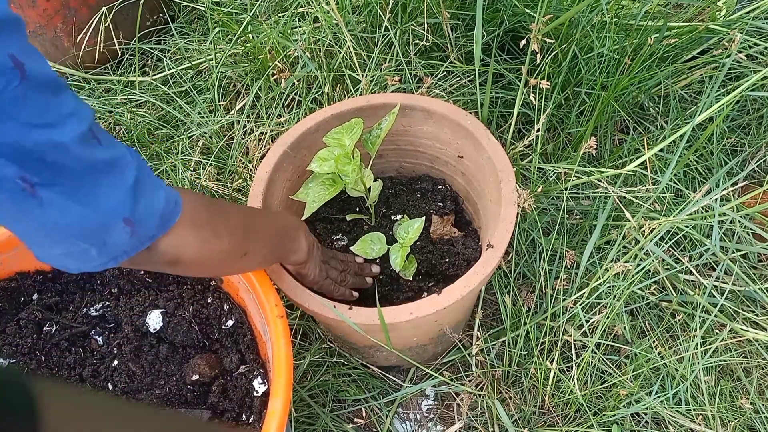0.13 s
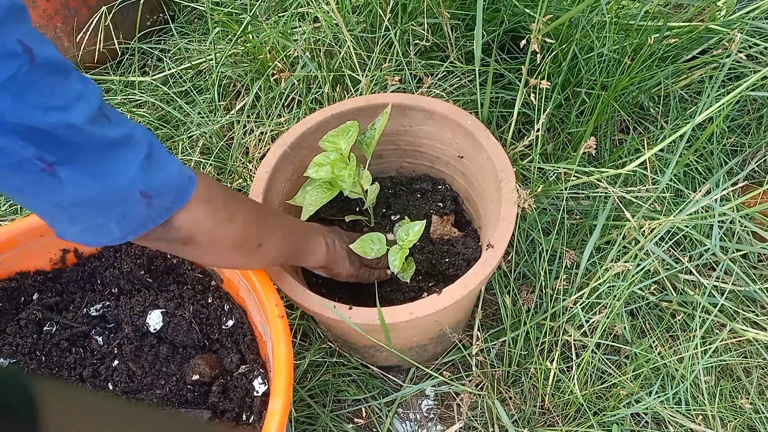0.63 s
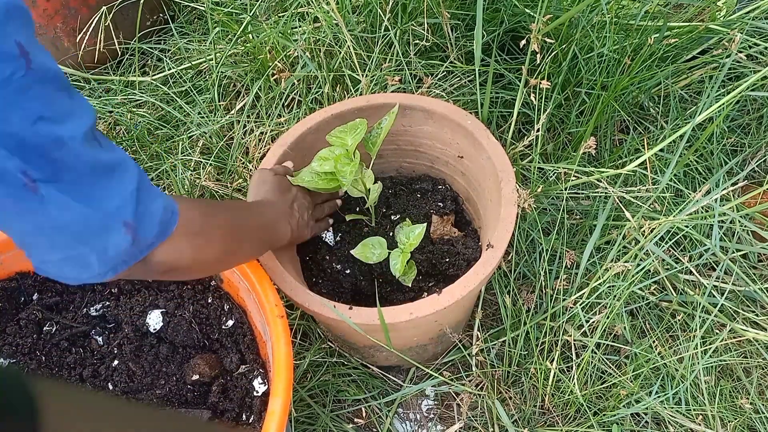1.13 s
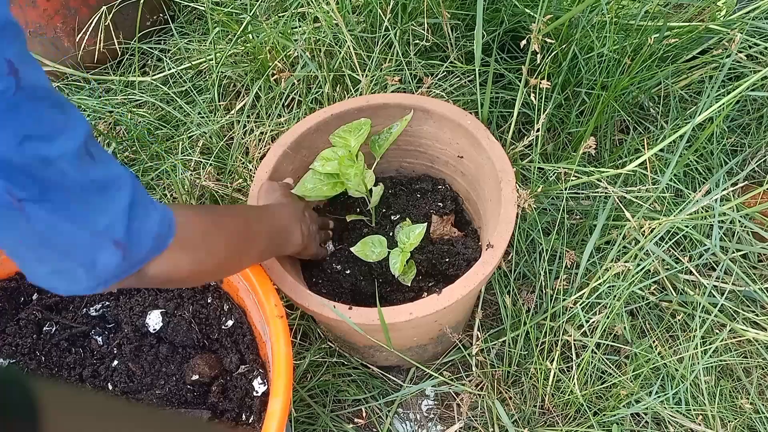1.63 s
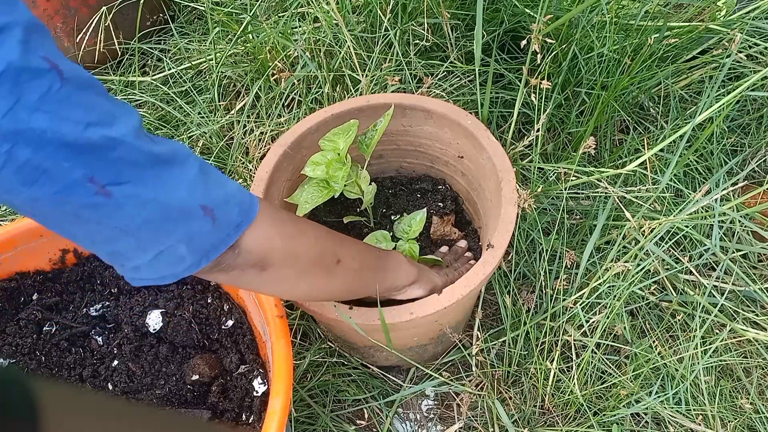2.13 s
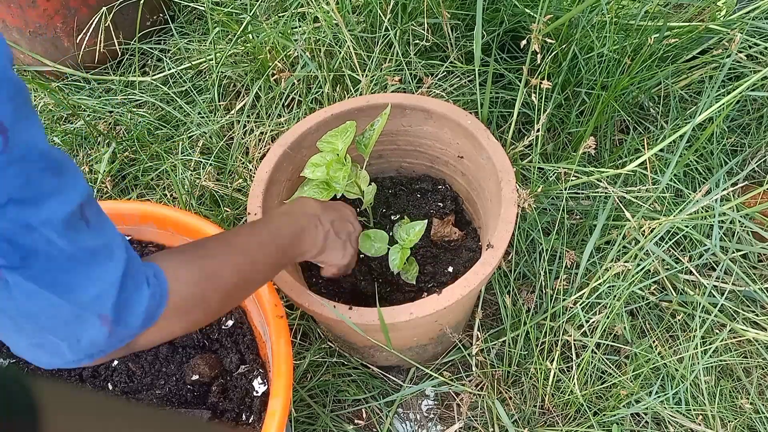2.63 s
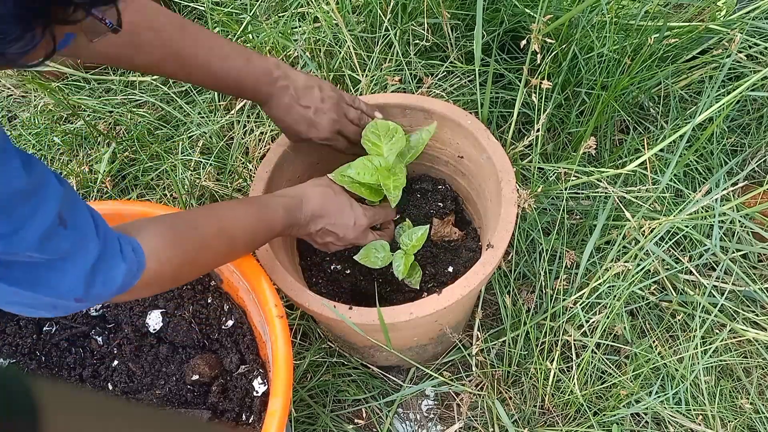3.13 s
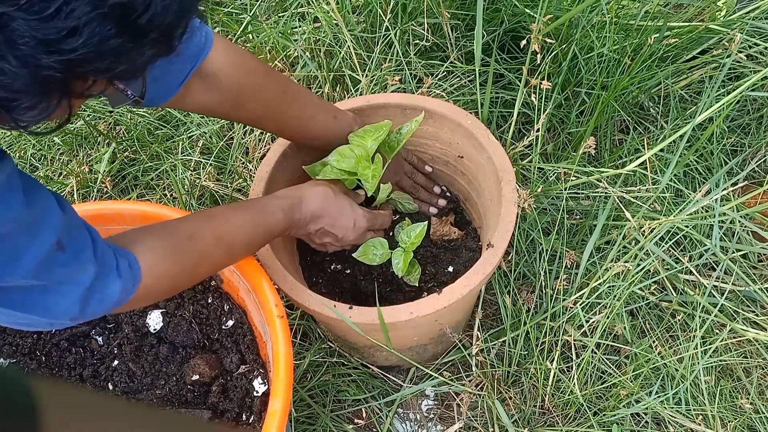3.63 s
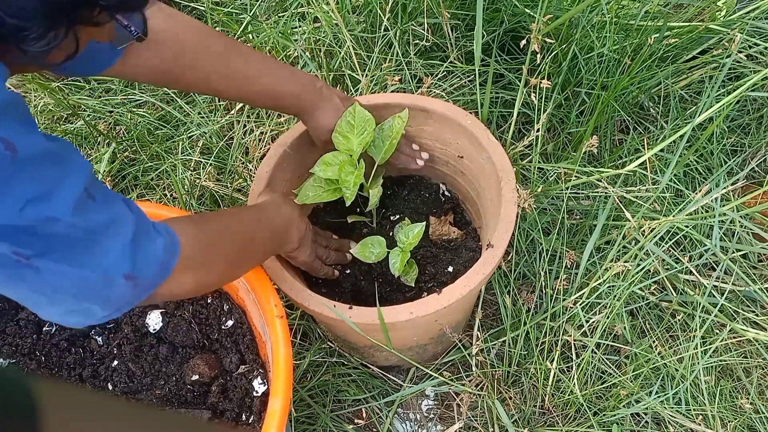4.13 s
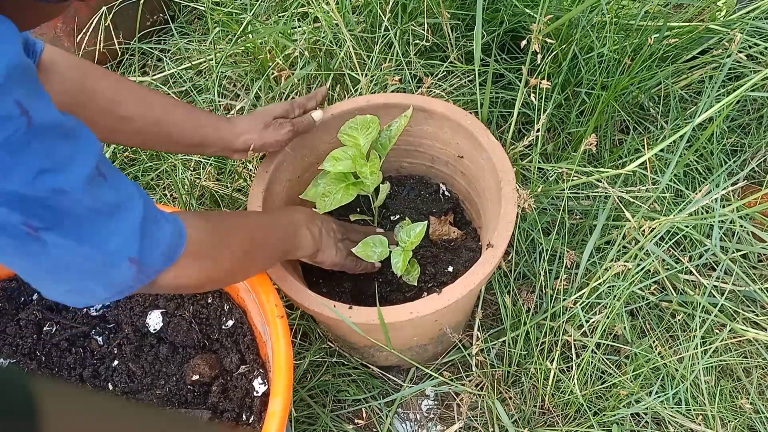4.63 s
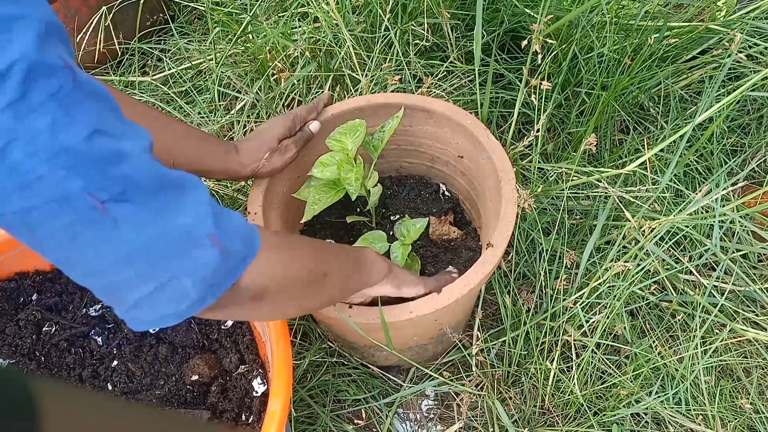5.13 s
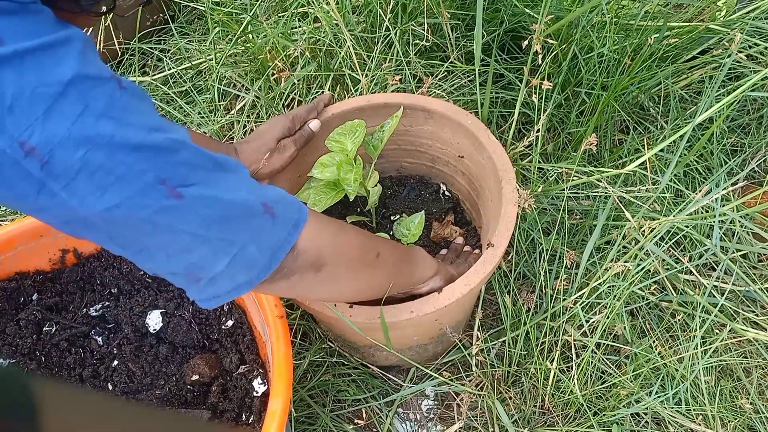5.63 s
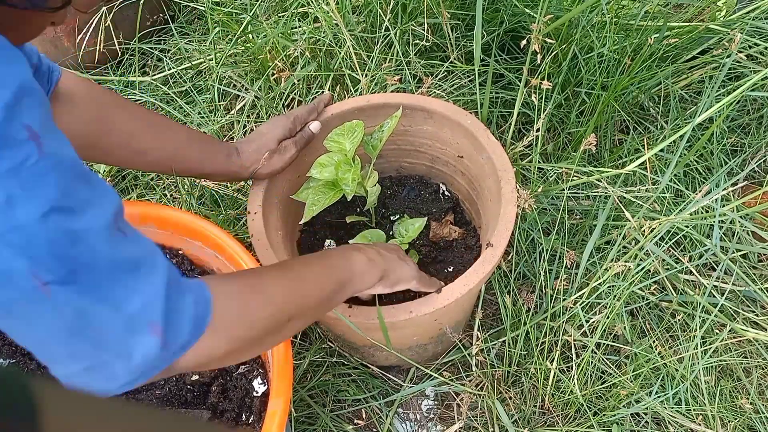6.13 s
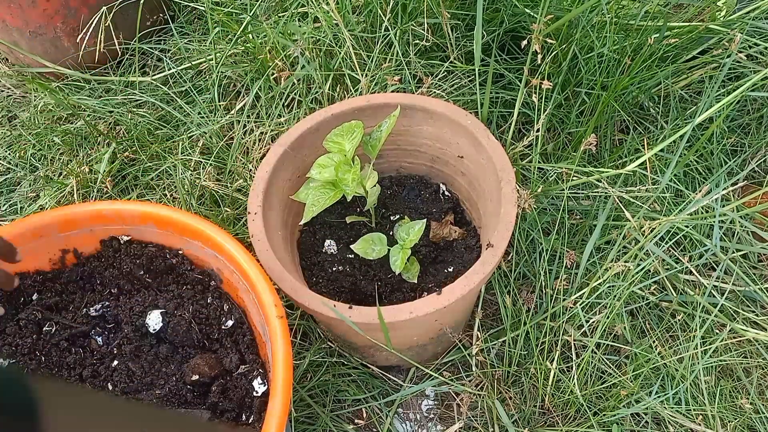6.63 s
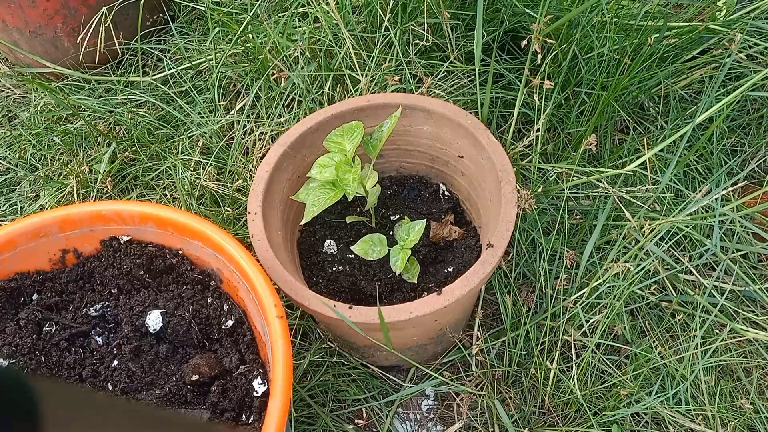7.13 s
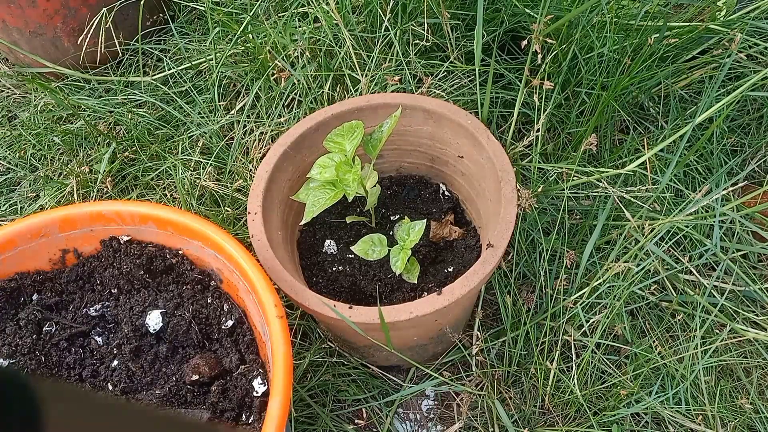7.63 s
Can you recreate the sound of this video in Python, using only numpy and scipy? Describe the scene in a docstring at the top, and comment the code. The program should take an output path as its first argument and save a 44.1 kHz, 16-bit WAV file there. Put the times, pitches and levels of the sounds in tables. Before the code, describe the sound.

In a garden, a near bird gives sharp, quickly falling chirps about twice a second, often followed by a short lower note, with brief reflections from ground and walls. Another bird answers late, and distant birds swoop, rasp and whistle faintly. Soft air and a faint low hum lie beneath. A barely audible pat comes midway; near the end a dull soil pat and a crisp snap sound close to the stereo microphone.

```python
"""Chirping bird in a walled garden

A near bird repeats a sharp falling chirp, often with a short low note after it: gliding sines and an overtone,
thrown back by ground and walls. Another bird answers; farther ones whistle and swoop as sines, or call hoarsely
as noise bands. Low sines of wandering level stand for the narrow noise bands of a machine hum; shaped noise makes
the soft air, with faint low blips in it. A faint soft pat comes midway; near the end a stronger pat and noise-struck
ringing snaps sound close to the microphone.
"""
import sys
import numpy as np
from scipy import signal
from scipy.fft import irfft
from scipy.io import wavfile
from scipy.ndimage import uniform_filter1d

SR = 44100
rng = np.random.default_rng(int(sys.argv[2]) if len(sys.argv) > 2 else 0)


def store_wav(level_fs):
    """Save 16-bit WAV to argv[1]."""
    pcm = np.round(np.clip(np.atleast_2d(level_fs), -1, 1) * 32767)
    wavfile.write(sys.argv[1], SR, pcm.T.astype(np.int16))


def amplitude_ratio(level_db):
    """Convert a level in decibels to the matching linear amplitude (field) ratio."""
    exponent = np.asarray(level_db, float) / 20
    return 10 ** exponent


N = 342657

# narrow low bands of the hum, each played as one sine: f/Hz
HUM_BANDS = [68.4, 87.5, 137.5]
# random level wander of narrow low noise bands, one list per band: t/s, level/dB
HUM_LEVELS = [
    [(0.0, -65), (0.48, -56.5), (0.93, -69), (1.1, -59), (1.6, -71.5), (2.21, -60), (2.32, -81),
     (2.53, -56), (3.81, -67.5), (3.87, -55), (5.28, -67), (6.79, -58), (6.9, -79), (7.12, -58.5),
     (7.75, -62), (7.77, -66)],
    [(0.0, -54), (0.15, -67), (0.41, -51.5), (0.73, -60.5), (0.84, -52.5), (1.82, -61), (1.86, -70),
     (2.21, -55.5), (2.36, -65.5), (6.25, -73), (6.51, -57.5), (6.84, -69), (7.23, -55.5), (7.62, -79),
     (7.73, -55), (7.77, -55)],
    [(0, -69), (2.6, -73.5), (4.6, -66), (5.2, -80), (6.8, -71), (7.77, -81.5)],
]
# spectrum of the air, before its overall level is set: f/Hz, relative density/dB
AIR_SPECTRUM = [(18, -41), (32, -28), (45, -7), (80, -5), (130, -9.5), (210, -14), (470, -12), (920, -15.5),
                (1600, -12), (2300, -15.5), (3500, -18), (5100, -21), (6400, -15.5), (7500, -28)]
# slow swell of the air: t/s, relative level/dB
AIR_SWELL = [(0, 0.15), (2.1, -1.2), (2.8, 1.2283), (5.8, 0.5), (7.77, -0.12)]
# likeness of the air left and right: f/Hz, correlation (1 = alike, below 0 = opposed)
AIR_LIKENESS = [(60, 0.9378), (130, 1), (290, 0.7282), (650, 0.1808), (1440, -0.43), (3200, 0.45),
                (7080, -0.016)]
# stereo lean of the air: f/Hz, left minus right/dB
AIR_LEAN = [(60, 2), (200, 1), (650, 0.5), (2150, 3.5), (7080, 1.5)]
# far falling swoops: end t/s, length/s, level/dB
SWOOPS = [(.174, .16, -54), (1.078, .17, -54.5), (2.01, .18, -54.5), (3.055, .12, -53), (4.138, .13, -52.5),
          (5.273, .14, -52), (6.35, .2, -51.5), (7.27, .19, -52)]
# faint hoarse calls: t/s, length/s, centre f/Hz, width/Hz, level/dB
HOARSE_CALLS = [(0.051, 0.28, 1640, 400.1, -60), (0.898, 0.2015, 6632, 300.8, -62.5),
                (1.622, 0.1984, 1838, 250, -58.5), (2.118, 0.27, 6260, 501, -64),
                (4.601, 0.28, 1570, 357, -63), (5.096, 0.1986, 1656, 342.3, -59),
                (5.905, 0.23906, 6520, 297.4, -62.5), (6.122, 0.3, 1484, 401.5, -57.5),
                (6.702, 0.1638, 1500, 247, -52), (2.5, 0.1356, 1160, 149.1, -56.5),
                (7.281, 0.35, 6270, 400, -61.5)]
# scattering of the garden: f/Hz, decay by 60 dB/s, relative level/dB
SCATTERING = [(1500, 0.39, -3.5), (2480, 0.51, -0.5), (3530, 0.47, 2.5), (5055, 0.4316, 3), (6561, 0.44, 7),
              (7494, 0.29, -2.5)]
# near bird's note shapes, before each call's pitch and length factors:
# onset f/Hz, turn f/Hz, rest f/Hz, sag time/ms, rise/ms, steady/ms, hold/ms, fade/(dB per ms)
CHIRP_SHAPE = (3050, 3885, 1940, 16.66, 4.5, 3.19, 27.5, 1.6)
LOW_NOTE_SHAPE = (2750, 2600, 1540, 24, 6, 0.53, 4.5, 1.42)
# near bird's calls: t at the end of the rise/s, peak level before the echoes/dB, pitch factor, length factor
CHIRPS = [(0.3456, -27, 0.95, 0.91), (0.773, -26, 0.95, 0.96), (1.3436, -25.5, 0.96, 0.94),
          (2.487, -23.5, 1, 0.94), (2.7883, -22, 0.97, 0.91), (3.1204, -20.5, 0.98, 0.94),
          (3.4935, -19.5, 0.99, 0.94), (3.8542, -22.5, 0.97, 0.97), (4.2601, -24, 0.96, 0.94),
          (4.8667, -25, 0.97, 0.9809), (5.2828, -24.5, 0.968, 1), (5.7019, -23, 0.96, .99),
          (6.2949, -23.5, 0.96, 0.91), (6.6709, -22, 0.95, 0.94), (7.2426, -26.5, 0.96, 0.97),
          (7.7006, -27, 0.96893, 0.91)]
LOW_NOTES = [(2.864, -22, 0.978, 1.01), (3.199, -20.5, 1, 1.01), (3.577, -20, 0.99, 1.01),
             (3.935, -21.5, 0.99, 1.01), (4.339, -25.5, 1.01, 1.01), (5.366, -25, 0.97, 1.1),
             (6.376, -24, 0.97, 0.93)]
# near bird's second harmonic, before the echoes: f/Hz, level relative to the fundamental/dB
OVERTONE = [(4000, -46), (4600, -37), (5100, -21), (5600, -22), (6200, -21), (6700, -16), (7200, -21),
            (7700, -26)]
# paths by air, ground and walls: left delay/ms, left level/dB, right delay/ms, right level/dB
SURFACES = [(0, 0, .437, -2.1), (.635, -10.9, 1.446, -16.8), (1.746, -2.5, 2.086, -5.4),
            (3.605, -14.9, 4.439, -13.9), (11.831, -10.6, 11.406, -17.6), (16.95, -9.5, 17.511, -12.6),
            (19.223, -13.4, 19.144, -14.8), (25.896, -2.8, 25.641, -7.4), (26.502, -9.7, 26.253, -10.8),
            (30.573, -11.3, 30.437, -17.9), (34.694, -5.5, 33.895, -8.7), (36.094, -12, 35.958, -17.9),
            (37.676, -8.6, 37.177, -12), (9.212, -14.5, 9.535, -16.8), (27.046, -13.1, 28.929, -17.2),
            (34.014, -14.8, 31.621, -15.3), (38.367, -14, 37.834, -15.1), (44.938, -11.5, 55.051, -18.3)]
# faint short low tones, like random flecks in the background noise: t/s, f/Hz, level before the taper/dB
BLIPS = [(0.901, 332.7, -57.5), (1.888, 250, -56.5), (2.782, 333, -61.5), (3.855, 339, -59),
         (0.831, 871.5, -62), (2.54, 868.4, -61.5), (3.581, 933.8, -60)]
# falling whistles, one list each: t/s, f/Hz, level before the echoes/dB
WHISTLES = [
    [(2.96, 6150, -72), (3.04, 5920, -57), (3.2, 5520, -55), (3.37, 5270, -59), (3.45, 5140, -49),
     (3.56, 4880, -53), (3.64, 4640, -55), (3.78, 4620, -70)],
    [(7.39, 6180, -66), (7.46, 6120, -59), (7.495, 5890, -52), (7.55, 5690, -50), (7.65, 5490, -48),
     (7.75, 5350, -44), (7.77, 5330, -50)],
]
# soft pats on soil: t/s, level at the start/dB
THUDS = [(7.285, -41), (4.384, -62)]
# answering bird's note shape, columns as for the near bird
ANSWER_SHAPE = (3000, 2780, 1800, 11, 4, 3.5, 11, 1.6)
# answers: t at the end of the rise/s, level before the echoes/dB
ANSWERS = [(5.791, -33.5), (6.759, -33)]
# resonances of the snapping thing: f/Hz, bandwidth/Hz, relative level/dB
SNAP_RESONANCES = [(499, 197.3, -16.5), (1500, 840, -28), (2850, 700, 0.5), (4743.3, 980, 6),
                   (6375, 500, -20)]
# snaps: t/s, level/dB, tilt/(dB per octave), contact/ms
SNAPS = [(7.6332, -35, -.4, 1.5), (7.6368, -23.5, 1.2, .3), (7.506, -55, -0.5, .3)]


def evened(x):
    """Scales to rms 1."""
    return x / np.sqrt(np.mean(x ** 2) + 1e-20)


def read(points, hz):
    """Reads a curve on a log-frequency axis."""
    f, value = np.transpose(points)
    return np.interp(np.log(hz + 1), np.log(f + 1), value)


def add(mix, s, sound):
    """Mixes a sound in at second s, cut where it overruns the scene."""
    skip = max(-round(s * SR), 0)
    start = max(round(s * SR), 0)
    part = mix[..., start:][..., :sound.shape[-1] - skip]
    part += sound[..., skip:skip + part.shape[-1]]


def band(x, hz, width):
    """A band-pass filter centred on hz."""
    sos = signal.butter(2, [hz - width / 2, hz + width / 2], "bandpass", fs=SR, output="sos")
    return signal.sosfilt(sos, x)


def tone(s, hz, db, waver_db=0.):
    """A sine along a pitch curve, of rms level db, with a randomly wavering level."""
    t = np.arange(s[0], s[-1], 1 / SR)
    phase = 2 * np.pi * (np.cumsum(np.interp(t, s, hz)) / SR + rng.random())
    waver = uniform_filter1d(rng.standard_normal(len(t)), size=300)
    waver = evened(uniform_filter1d(waver, size=300))
    level_db = np.interp(t, s, db) + waver_db * waver
    return np.sqrt(2) * amplitude_ratio(level_db) * np.sin(phase)


def softened(sound):
    """Rounds off both ends of a sound."""
    return sound * signal.windows.tukey(len(sound), .3)


def echoes(x, taps, gain_db_per_ms=0.):
    """Sum of delayed copies, delays exact between samples; later ones may gain level."""
    ms, db = np.transpose(taps)
    hz = np.fft.rfftfreq(4096, 1 / SR)
    lead = 64  # samples of room for the ringing ahead of a fractional delay
    turns = np.exp(-2j * np.pi * hz[:, None] * (ms / 1000 + lead / SR))
    paths = irfft((amplitude_ratio(db + gain_db_per_ms * ms) * turns).sum(axis=1))
    return signal.oaconvolve(x, paths)[lead:N + lead]


def tail(x, start_s, rise_s):
    """Many weak scattered echoes of random sign, each band dying at its own speed."""
    t = np.arange(SR // 2) / SR
    signs = rng.choice([-1., 1.], (len(t), 2)).T
    present = rng.random((len(t), 2)).T < .04
    taps = signs * present * np.clip((t - start_s) / rise_s, 0, 1)
    hz, s, z = signal.stft(taps, SR, nperseg=256)
    f, t60, db = np.transpose(SCATTERING)
    decay_db = np.interp(hz, f, db)[:, None] - 60 * s / np.interp(hz, f, t60)[:, None]
    ring = signal.istft(z * amplitude_ratio(decay_db), SR, nperseg=256)[1]
    ring = ring / np.linalg.norm(ring, axis=1)[:, None]
    return signal.oaconvolve(x[None], ring, axes=1)[:, :N]


def note(onset_hz, turn_hz, rest_hz, sag_ms, rise_ms, steady_ms, hold_ms, fade_db_per_ms):
    """Pitch glides to its turn as the level rises, then sags toward rest while the level swells, fades, closes."""
    onset_db, swell_db, fade_db = -29, 2.2, 17.5
    close_ms, close_db = 3.4, -11  # the quick close after the fade
    droop_hz_per_ms = 15.4  # the pitch slips further as the breath runs out
    end_ms = hold_ms + fade_db / fade_db_per_ms
    ms = np.linspace(-rise_ms, end_ms + close_ms, num=80)
    rising = turn_hz + (turn_hz - onset_hz) * ms / rise_ms
    sagging = rest_hz + (turn_hz - rest_hz) * np.exp(-np.maximum(ms - steady_ms, 0) / sag_ms)
    hz = np.where(ms < 0, rising, sagging)
    hz = hz - droop_hz_per_ms * np.maximum(ms - hold_ms, 0)
    corners_ms = [-rise_ms, 0, hold_ms / 2, hold_ms, end_ms, ms[-1]]
    corners_db = [onset_db, -swell_db, 0, 0, -fade_db, close_db - fade_db]
    return ms, hz, np.interp(ms, corners_ms, corners_db)


def hum():
    """Low sines whose levels wander as narrow noise bands beat by chance, nearly alike at both microphones."""
    out = np.zeros(N)
    for hz, rows in zip(HUM_BANDS, HUM_LEVELS):
        s, db = np.transpose(rows)
        add(out, 0, tone(s, hz + 0 * s, db, waver_db=2.0))
    return out * amplitude_ratio([[.3], [-.3]])


def air():
    """Soft outdoor noise: random short-time spectra with faint patches and a slow swell."""
    level_db, patch_db = -54, 2.2
    frames, hz = N // 512 + 5, np.fft.rfftfreq(2048, 1 / SR)
    a, b, c, d, patches = rng.standard_normal((frames, 1025, 5)).T
    patches = uniform_filter1d(patches, size=20, axis=0)  # across frequency
    patches = evened(uniform_filter1d(patches, size=8, axis=1))  # across time
    s, swell_db = np.transpose(AIR_SWELL)
    swell_db = np.interp(np.arange(frames) * 512 / SR, s, swell_db)
    same = np.clip(read(AIR_LIKENESS, hz), -1, 1)[:, None]
    left = a + 1j * b
    right = same * left + np.sqrt(1 - same ** 2) * (c + 1j * d)
    lean = read(AIR_LEAN, hz)[:, None] / 2
    shape_db = read(AIR_SPECTRUM, hz)[:, None] + patch_db * patches + swell_db
    z = np.array([left, right]) * amplitude_ratio(shape_db + np.array([lean, -lean]))
    noise = signal.istft(z, nperseg=2048, noverlap=1536)[1][:, :N]
    return amplitude_ratio(level_db) * evened(noise)


def far_birds():
    """Falling sine swoops and hoarse bands of breathy noise, half lost in scattered echoes."""
    end_hz, octaves_per_s = 2500, 6.9
    swell_db_per_s, full_s = 260, .075  # a swoop is at full level for its last full_s
    voice = np.zeros(N)
    for end, length, level_db in SWOOPS:
        before = np.linspace(-length, 0, num=30)
        hz = end_hz * 2 ** (-octaves_per_s * before)
        db = level_db - swell_db_per_s * np.maximum(-before - full_s, 0)
        add(voice, end - length, softened(tone(before, hz, db, waver_db=3.0)))
    for s, length, hz, width, db in HOARSE_CALLS:
        breath = evened(band(rng.standard_normal(SR // 2), hz, width))[:round(length * SR)]
        add(voice, s, amplitude_ratio(db) * softened(breath))
    direct = amplitude_ratio([[1.5], [-1.5]]) * np.array([voice, np.roll(voice, 9)])  # right 9 samples later
    return direct + amplitude_ratio(-4) * tail(voice, 0.0037, 0.026)


def near_bird():
    """Each call replays one of two notes, scaled in pitch and length, into the fixed echoes of the garden."""
    voice, overtone = np.zeros((2, N))
    for shape, calls in ((CHIRP_SHAPE, CHIRPS), (LOW_NOTE_SHAPE, LOW_NOTES)):
        ms, hz, db = note(*shape)
        for s, level_db, pitch, length in calls:
            at = s + length * ms / 1000
            add(voice, at[0], tone(at, pitch * hz, db + level_db) / np.sqrt(2))
            second_hz = 2 * pitch * hz
            second_db = db + level_db + read(OVERTONE, second_hz)
            add(overtone, at[0], tone(at, second_hz, second_db, waver_db=3.4) / np.sqrt(2))
    # the beak beams the overtone away from the microphones: more of it comes back from walls and leaves
    paths = np.array(SURFACES)
    walls = [echoes(voice, taps) + echoes(overtone, taps, gain_db_per_ms=.2)
             for taps in (paths[:, :2], paths[:, 2:])]
    # scattering builds up after the first strokes
    scattered = tail(voice + amplitude_ratio(8.5) * overtone, start_s=.012, rise_s=.04)
    return np.array(walls) + amplitude_ratio([[-9], [-11.5]]) * scattered


def blips():
    """Faint short low sines under a smooth taper, like random flecks in the background noise."""
    length_s = 0.073
    out = np.zeros(N)
    for s, hz, db in BLIPS:
        blip = tone([0, length_s], [hz, hz], [db, db])
        add(out, s, blip * np.hanning(len(blip)))
    return out


def whistler():
    """Long thin falling whistles, sines doubled by two far walls."""
    voice = np.zeros(N)
    for rows in WHISTLES:
        add(voice, rows[0][0], tone(*np.transpose(rows), waver_db=1.5))
    # echo delay/ms, level/dB
    left = echoes(voice, [(0, 0.0), (4, -6), (45, -7.5), (86, -14)])
    right = echoes(voice, [(.3, -6.5), (5, -9.5), (46, -9), (87, -11.5)])
    return np.array([left, right]) + amplitude_ratio(-4.5) * tail(voice, .005, 0.024)


def thuds():
    """A pat on soil is a dull puff of low noise that dies fast, with no ring."""
    low_hz, high_hz, t60_s = 130, 1200, .07
    out, t = np.zeros((2, N)), np.arange(4000) / SR
    dull = signal.butter(1, [low_hz, high_hz], "bandpass", fs=SR)
    for s, db in THUDS:
        puff = evened(signal.lfilter(*dull, rng.standard_normal(4000)))
        add(out, s, puff * np.minimum(t / .002, 1) * amplitude_ratio(db - 60 * t / t60_s))
    return out


def answering_bird():
    """A steep short note with a second harmonic, from another perch with its own echoes."""
    voice = np.zeros(N)
    ms, hz, db = note(*ANSWER_SHAPE)
    for s, level_db in ANSWERS:
        fundamental = tone(ms / 1000, hz, db + level_db)
        second = tone(ms / 1000, 2 * hz, db + level_db - 18.5)
        add(voice, s + ms[0] / 1000, fundamental + second)
    # echo delay/ms, level/dB
    left = echoes(voice, [(0, -1.5), (1.7, -0.5), (17, -12.5), (26, 1), (35, -1.5), (45, -3.5)])
    right = echoes(voice, [(.4, 3.0), (2.1, -11.0), (17, -10), (26, -17), (34, -13.0), (55, -19)])
    return np.array([left, right]) + amplitude_ratio(-2) * tail(voice, 0.0024, 0.011)


def snaps():
    """An uneven contact rings short broad resonances, and a gritty noise rustle swells up just after."""
    lean_db, rustle_db = 6, -20  # left minus right; rustle under the snap
    out, t = np.zeros((2, N)), np.arange(4000) / SR
    for s, db, tilt_db, contact_ms in SNAPS:
        ring = np.zeros(4000)
        for hz, width, mode_db in SNAP_RESONANCES:
            level = amplitude_ratio(mode_db + tilt_db * np.log2(hz / 500) + db)
            ring += level * np.exp(-np.pi * width * t) * np.sin(2 * np.pi * hz * t)
        push = rng.standard_normal(4000) * np.exp(-t / (contact_ms / 1000))
        ring = signal.oaconvolve(ring, push / np.linalg.norm(push))[:4000]
        ring = band(ring, 3700, 6900)  # a small thing sends out no deep bass
        grit_db = db + rustle_db - 200 * abs(t - .035)  # strongest 35 ms in
        grit = band(rng.standard_normal((4000, 2)).T, 3300, 4600) * amplitude_ratio(grit_db)
        add(out, s, ring * amplitude_ratio([[lean_db / 2], [-lean_db / 2]]) + grit * np.minimum(t / .003, 1))
    return out


def scene():
    """All sources at the two microphones."""
    birds = far_birds() + near_bird() + whistler() + answering_bird()
    return hum() + air() + blips() + birds + thuds() + snaps()


def band_limit(x):
    """A steep low-pass at the top of the band."""
    return signal.sosfilt(signal.butter(12, 7680, fs=SR, output="sos"), x)


def record(dry):
    """The recorder's steep low-pass keeps next to nothing above its band edge."""
    edge_hz = 7620
    edge = signal.firwin(401, edge_hz, window=("kaiser", 9), fs=SR)
    mix = signal.oaconvolve(dry, edge[None], "same", axes=1)
    return band_limit(mix)


dry = scene()
out = record(dry)
store_wav(out)
```